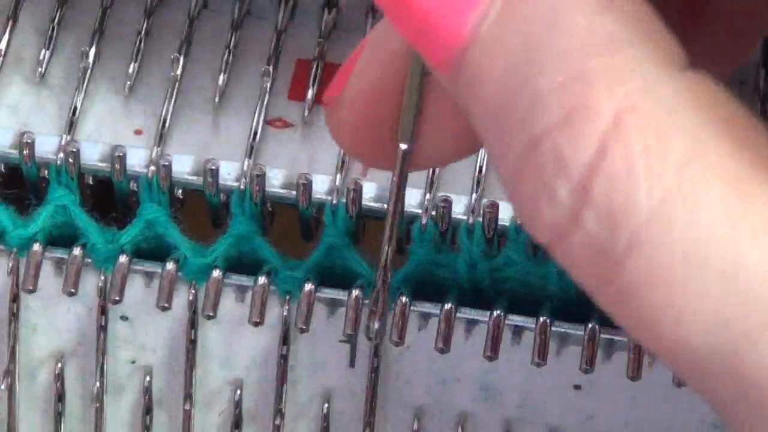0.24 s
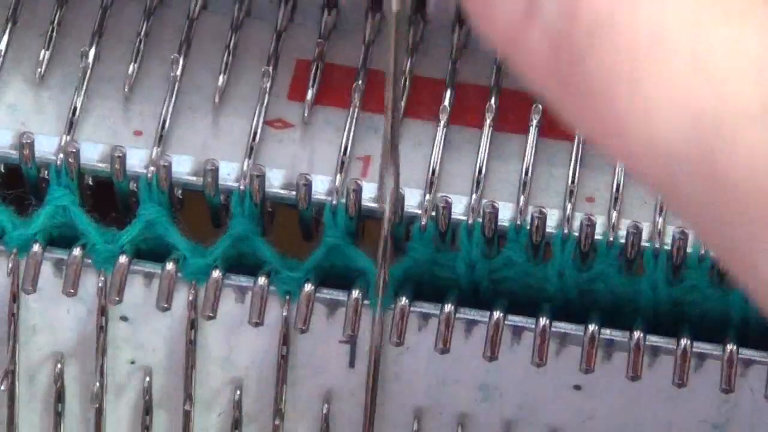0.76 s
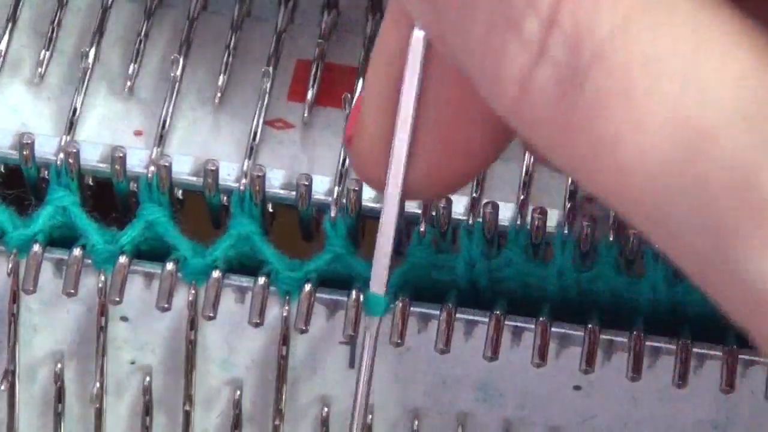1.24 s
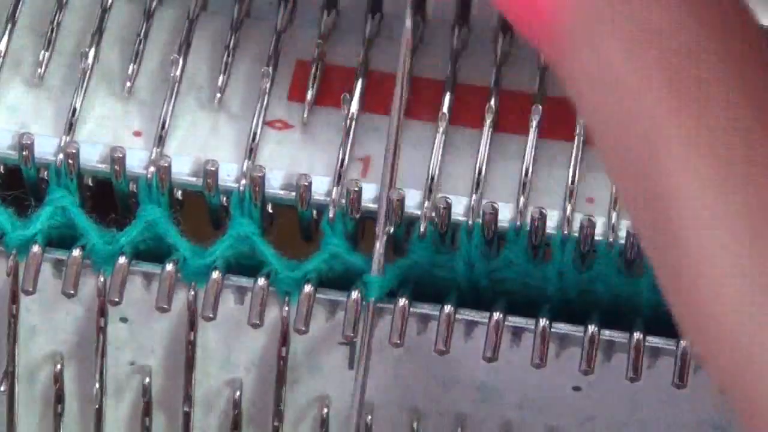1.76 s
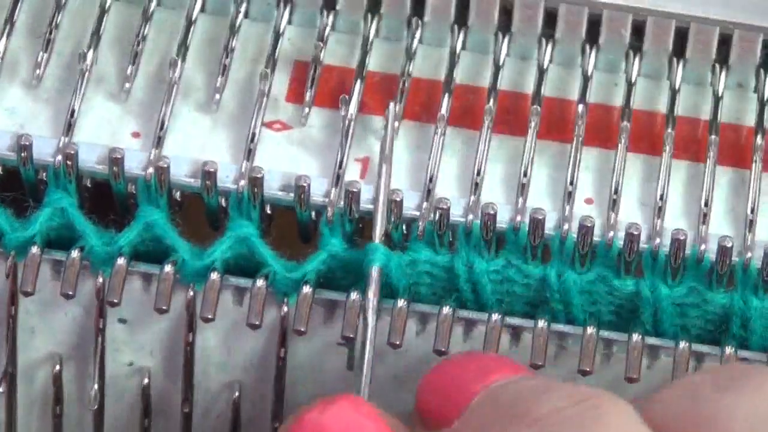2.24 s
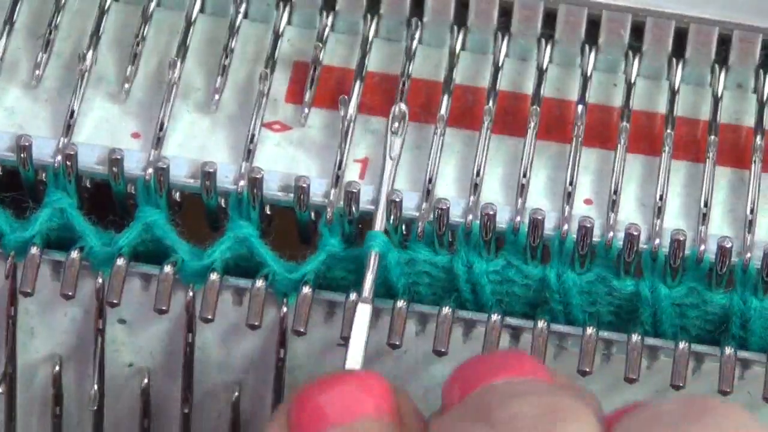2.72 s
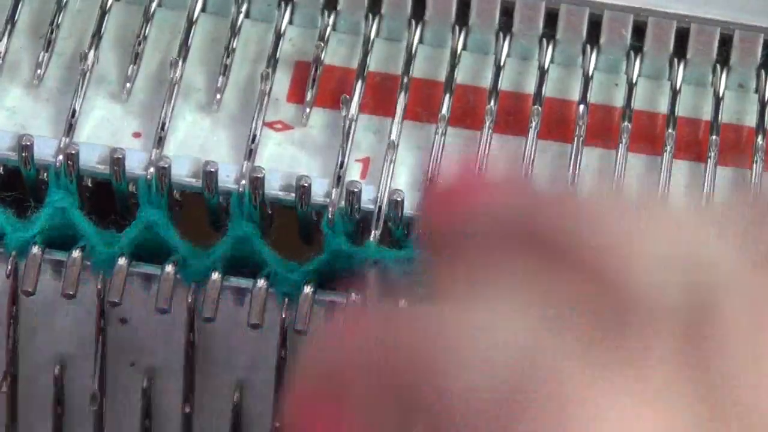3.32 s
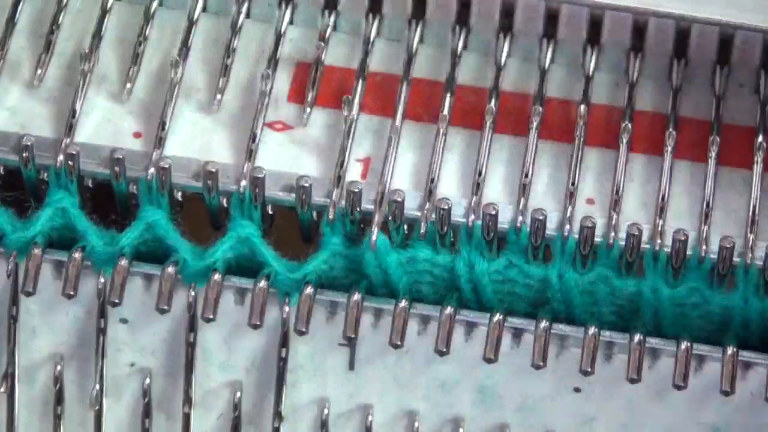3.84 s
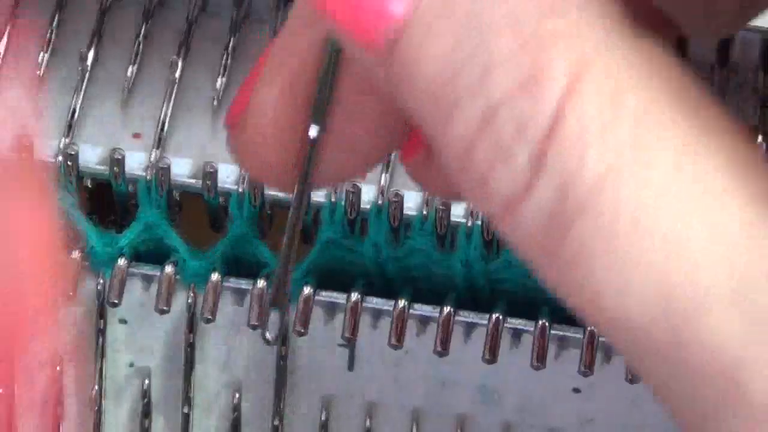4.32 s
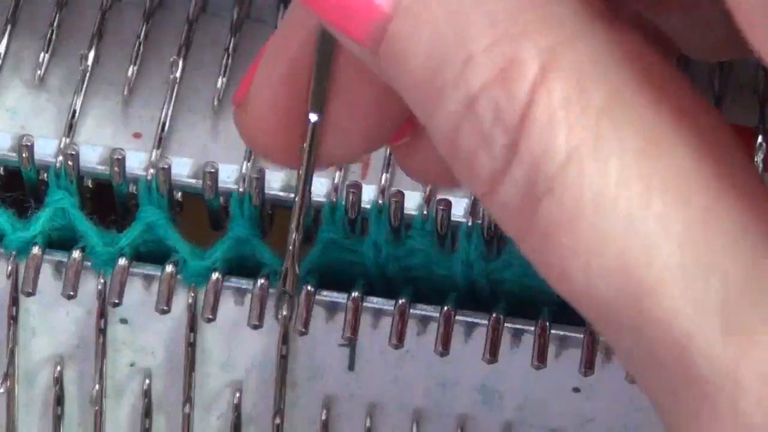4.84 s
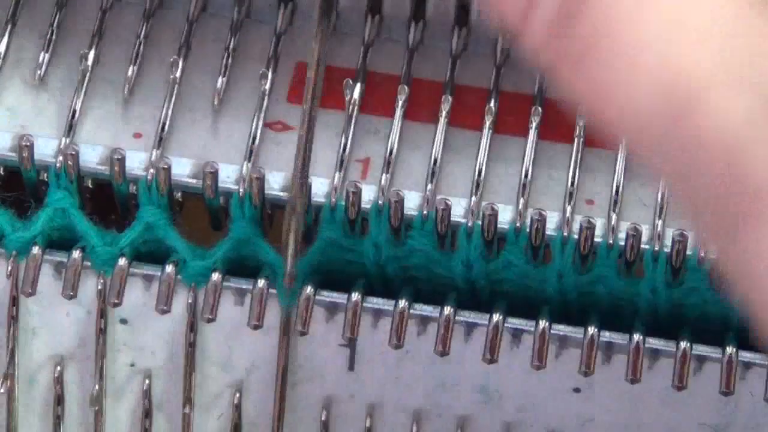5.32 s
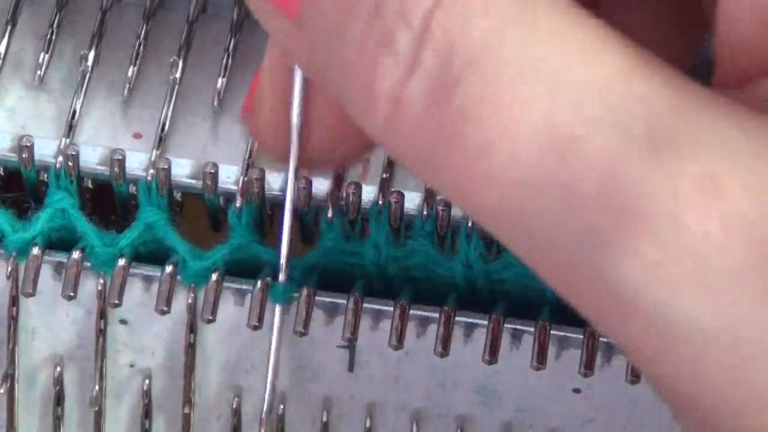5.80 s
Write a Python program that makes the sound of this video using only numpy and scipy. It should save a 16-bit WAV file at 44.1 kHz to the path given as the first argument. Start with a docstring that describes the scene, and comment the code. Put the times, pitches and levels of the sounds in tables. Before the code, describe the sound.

Close, irregular steel clicks, short scrapes and small knocks as stitches are moved by hand on a knitting machine in a quiet room.

```python
"""Light steel ticks and soft rubbing, close by, over a faint fan and low hum in a quiet room.
Stitches are moved by hand between the two steel needle beds of a knitting machine.
A slim transfer tool ticks on hooks and steel scrapes briefly; needles knock at their stops and clack
against the tool; latches snap over. Each blow rings the slim parts' bending modes and the heavy bed;
a seating needle shakes the bed's plate and thuds through frame and table."""
import sys
import numpy as np
from scipy import signal
from scipy.fft import rfft, irfft
from scipy.io import wavfile
from scipy.ndimage import uniform_filter1d

SR = 44100
rng = np.random.default_rng(int(sys.argv[2]) if len(sys.argv) > 2 else 0)


def to_wav(s):
    """Save 16-bit WAV."""
    ch = np.atleast_2d(s).T  # columns
    pcm = np.round(np.clip(ch, -1, 1) * 32767)  # PCM
    wavfile.write(sys.argv[1], SR, pcm.astype(np.int16))


N = 267246
TOP_HZ = 16100
HIT_SAMPLES = 16384
AGE_S = np.arange(HIT_SAMPLES) / SR

# Spectra of the tool's touch and of the bed. Each row: frequency in Hz, gain in dB.
TOOL_SPECTRUM = [(200, -14), (2000, -6), (4200, 0), (7000, -5), (9800, 0), (12000, -3), (14000, -10),
                 (15800, -21)]
BED_SPECTRUM = [(60, -25), (400, -11), (600, -5.5), (800, 0.5), (980, -0.5), (1150, -1), (1500, -7),
                (2200, -9.5), (5000, -25)]
# A needle's bending modes. Each row: frequency in Hz, t60 in seconds, relative level in dB.
NEEDLE_BENDING = [(1600, 0.02, -2.5), (2790, 0.029, -1), (3100, 0.084, 0.5), (3730, 0.037, -3.5),
                  (4420, .053, -6), (6030, 0.052, -7.5), (10040, 0.0069, 4.5)]


def undb(db):
    """Decibels to gain."""
    return 10 ** (np.asarray(db) / 20)


def curve(points, hz):
    """Read (Hz, dB) points on a log-frequency axis."""
    points_hz, db = np.transpose(points)
    return np.interp(np.log(hz + 1), np.log(points_hz), db)


def bins(size):
    """Spectrum frequencies in Hz for this many samples."""
    return np.fft.rfftfreq(size, 1 / SR)


def lift(hz, centre_hz, width_hz, db):
    """Resonant hump in dB."""
    return db / (1 + (2 * (hz - centre_hz) / width_hz) ** 2)


def resonance(hz, width_hz):
    """Band-pass gain over the whole scene's spectrum."""
    f = bins(N) + 1
    return 1 / np.sqrt(1 + ((f * f - hz * hz) / (f * width_hz)) ** 2)


def burst(x, db):
    """Scale a short sound to the energy of 10 ms at this level."""
    energy = np.mean(np.sum(np.atleast_2d(x) ** 2, axis=-1))
    return x * undb(db) * np.sqrt(SR / 100 / energy)


def rise(tau_s):
    """Exponential rise to 1."""
    return 1 - np.exp(-AGE_S / tau_s)


def fade(t60_s):
    """Exponential decay from 1."""
    return np.exp(-np.log(1000) * AGE_S / t60_s)


def colour(x, db):
    """Minimum-phase filter with this gain per bin."""
    cepstrum = irfft(np.log(undb(db)))
    cepstrum[1:HIT_SAMPLES // 2] *= 2
    cepstrum[HIT_SAMPLES // 2 + 1:] = 0
    return irfft(rfft(x) * np.exp(rfft(cepstrum)))


def diffuse(side_db, size=HIT_SAMPLES):
    """Stereo noise, widest in the bass; side_db shifts the width."""
    # Each row: frequency in Hz, side re mid in dB.
    stereo_width = [(30, -2), (60, -3), (125, -2), (250, -9), (500, -8.5), (1000, -12), (2400, -15),
                    (4400, -28), (8100, -4), (15000, -50)]
    mid, side = rfft(rng.standard_normal((2, size)))
    side_gain = undb(side_db + curve(stereo_width, bins(size)))
    return irfft(mid + side_gain * side * np.array([[1], [-1]]), size)


def steady(gain):
    """Stereo noise of this spectrum, rms 1."""
    noise = irfft(gain * rfft(diffuse(side_db=-0.5, size=N)), N)
    return noise / np.sqrt(np.mean(noise ** 2))


def even(x, width_hz):
    """Flatten a burst's broad spectral humps, keep its fine structure."""
    spectrum = rfft(x)
    power = np.mean(np.abs(np.atleast_2d(spectrum)) ** 2, axis=0)
    smooth_power = uniform_filter1d(power, int(width_hz * HIT_SAMPLES / SR))
    return irfft(spectrum / np.sqrt(smooth_power + 1e-12))


def mode(hz, t60_s, split, twin_db=-6):
    """A ringing mode beating against a weaker neighbour on each side."""
    twins_hz = hz * (1 + split * rng.uniform(0.25, 1.73, (2, 1)) * np.array([[1], [-1]]))
    twins = np.sin(2 * np.pi * (twins_hz * AGE_S + rng.random((2, 1)))).sum(axis=0)
    return fade(t60_s) * rise(1 / hz) * (np.sin(2 * np.pi * hz * AGE_S) + undb(twin_db) * twins)


def rings(modes, focus_hz, fall_db_oct, split, twin_db, spread_db=3.5):
    """A part's modes after a blow; each spot struck weights them anew and favours focus_hz."""
    chance_db = spread_db * rng.standard_normal(len(modes))
    return sum(burst(mode(hz, t60_s, split, twin_db),
                     db + luck_db - fall_db_oct * abs(np.log2(hz / focus_hz)))
               for (hz, t60_s, db), luck_db in zip(modes, chance_db))


def add(out, start_s, sound):
    """Mix a hit in, easing its last 100 ms to silence."""
    start = int(start_s * SR)
    ease = np.minimum(AGE_S[::-1] / .1, 1) ** 2
    out[:, start:start + HIT_SAMPLES] += (sound * ease)[..., :N - start]


def contacts(hits, spectrum, modes, ring_db, ring_t60_s, tail_db, tail_t60_s,
             ping_db, ping_t60_s, tip_db, bed_gain_db):
    """Steel on steel: hard tip, brief chatter, bending modes, dense needle ring, the bed beneath.
    Each row of hits: start in seconds, level in dB, tilt in dB per octave, contact time in seconds,
    bed level in dB before bed_gain_db, modes in dB re level, ping frequency in Hz."""
    # Resonances of all steel parts. Each row: centre in Hz, width in Hz, lift in dB.
    steel_resonances = [(3100, 1100, 4), (4460, 3000, 3.5), (5850, 1100, 5), (9460, 680, 3.5),
                        (12000, 1600, 0.5), (14600, 1400, 6)]
    out, hz = np.zeros((2, N)), bins(HIT_SAMPLES)
    steel_db = curve(spectrum, hz) + sum(lift(hz, *row) for row in steel_resonances)
    for start_s, db, tilt_db_oct, contact_s, bed_db, modes_db, ping_hz in hits:
        chatter = burst(diffuse(side_db=1.5) * np.exp(-AGE_S / (1.95 * contact_s)), 0)
        tip = burst(signal.unit_impulse(HIT_SAMPLES, int(.3 * contact_s * SR)), tip_db)
        crack = burst(even(chatter + tip, width_hz=5500), 0)
        # the ring spreads along the needle row and dies into the room
        spread = rise(0.00057) * (fade(ring_t60_s) + undb(tail_db) * fade(tail_t60_s))
        ring = burst(even(diffuse(side_db=1.5) * spread, width_hz=850), ring_db)
        shape_db = steel_db + tilt_db_oct * np.log2(np.clip(hz, 1500, 14000) / 5500)
        shape_db -= 10 * np.log10(np.mean(undb(shape_db[hz < TOP_HZ]) ** 2))  # unit mean power
        ping = burst(mode(ping_hz, ping_t60_s, split=0.062), ping_db)
        bending = burst(rings(modes, ping_hz, fall_db_oct=7.5, split=0.0235, twin_db=-3.5), modes_db)
        add(out, start_s, undb(db) * (colour(crack + ring, shape_db) + ping + bending))
        # the heavy bed answers more slowly
        swell = rise(0.0011) * (fade(0.21) + undb(-36) * fade(0.48))
        bed = colour(even(diffuse(side_db=-6.5) * swell, width_hz=360), curve(BED_SPECTRUM, hz))
        add(out, start_s, burst(bed, bed_db + bed_gain_db))
    return out


def room(air_db=-55, fan_db=-54, hum_db=-71, fan_pan_db=3, hum_pan_db=-13):
    """Air noise, a fan whirring in its housing, a wavering low hum mostly on the right."""
    # Each row: frequency in Hz, relative density in dB.
    air_spectrum = [(20, -37), (45, -30), (75, -1), (150, -1), (300, -0.5), (450, -3.5), (750, 0.5),
                    (1100, 4), (1700, -2), (2600, -6), (5500, -8.5), (8000, -12.5), (11000, -13),
                    (15800, -15.5)]
    # Each row: centre in Hz, width in Hz, relative level in dB.
    housing_resonances = [(680, 61, -5.5), (895.6, 97, 3.5), (1123, 92, 1.5), (1238.6, 45, 5),
                          (1457, 83, -6.5), (2078, 31, -7.5), (2540, 48, -15), (2845, 91, -14),
                          (5250, 85, -13)]
    sides = np.array([[.5], [-.5]])
    air = undb(air_db) * steady(undb(curve(air_spectrum, bins(N))))
    fan_power = sum((undb(db) * resonance(hz, width_hz) ** 2) ** 2
                    for hz, width_hz, db in housing_resonances)
    fan = undb(fan_db + fan_pan_db * sides) * steady(np.sqrt(fan_power))
    hum = undb(hum_db + hum_pan_db * sides) * steady(resonance(hz=48.7, width_hz=4.5) ** 2)
    return air + fan + hum


def handling(hiss_db=-16):
    """Fingers brush at a low, drifting pitch; a faint hiss near 3.6 kHz swells with the rubbing."""
    # Each row: time in seconds, level in dB, brush centre in Hz.
    rubbing = [(0, -71, 220), (.18, -63, 220.3), (.8, -76, 240), (1.3, -78, 299.7), (1.68, -62.5, 298.5),
               (2.5, -82, 220.5), (3.3, -83, 300.2), (3.72, -61, 321), (4.1, -75.5, 270.6),
               (4.429, -60, 345.2), (4.7, -82, 330.2), (5.3, -68, 320), (5.65, -59, 317.8),
               (6.05, -70.5, 398)]
    t = np.arange(N) / SR
    times_s, db, hz = np.transpose(rubbing)
    hiss = undb(hiss_db) * steady(resonance(hz=3600, width_hz=700) ** 2)
    brush = signal.hilbert(steady(resonance(hz.mean(), width_hz=130) ** 2))
    drift = np.exp(2j * np.pi * np.cumsum(np.interp(t, times_s, hz) - hz.mean()) / SR)
    return undb(np.interp(t, times_s, db)) * ((brush * drift).real + hiss)


def tool_ticks(grazes_per_s=2, graze_db=-61, graze_spread_db=5, ping_hz=10600):
    """The tool's tip touches hooks and pegs; the brighter the touch, the less it moves the bed."""
    # Each row: start in seconds, level in dB, tilt in dB per octave, contact time in seconds,
    # modes in dB re level.
    touches = [(0.1176, -54, 10, .0013, -15), (0.2256, -50.5, 1, 0.00079, -18),
               (0.2975, -49, 3, 0.0017, -17), (0.4133, -55, 2, 0.0035, 0), (0.5084, -51, 0, 0.0015, -12),
               (0.6442, -47, 1, 0.0023, -15), (0.799, -46.5, 4, 0.0017, -14),
               (0.9635, -49.5, -5, .0023, -12), (0.976, -52, 2, .0022, -10),
               (1.0456, -49.5, -2, .0028, -19), (1.7405, -52.5, 11, 0.0013, -12),
               (2.052, -54, 9, .0013, -15), (2.419, -49.5, 5, 0.003, -19), (2.4948, -45.5, 2, 0.0033, 1.5),
               (3.135, -49.5, 4, 0.0017, -15), (3.189, -54, 2, .004, 2), (3.2161, -43.5, 8, .0018, -4.5),
               (3.9098, -52, 5, .0038, -15), (4.0146, -54, 5, .003, -15), (4.48, -50.5, 5.5, .0008, -8),
               (4.6588, -44, 1, 0.0032, -15), (4.729, -43.5, 0.5, 0.0023, -19),
               (5.323, -49, 2.5, .0009, -8), (5.4361, -42.5, 0, .004, 0), (5.4915, -54, 2, 0.0032, -1),
               (5.5016, -50.5, 2, .0028, -3), (5.718, -41.5, 0, 0.005, -19)]
    # Each row: frequency in Hz, t60 in seconds, relative level in dB.
    tool_bending = [(4260, .2, 3), (11640, 0.063, 0.5), (12200, .07, -8)]
    grazes = [(when * N / SR, graze_db + graze_spread_db * (1 - 2 * softness), 3, .002, -12)
              for when, softness in rng.random((int(grazes_per_s * N / SR), 2))]
    hits = []
    for start_s, db, tilt_db_oct, contact_s, modes_db in touches + grazes:
        bed_db = db - 6 - .9 * tilt_db_oct
        hz = ping_hz * rng.uniform(0.91, 1.04)
        hits.append((start_s, db, tilt_db_oct, contact_s, bed_db, modes_db, hz))
    return contacts(hits, TOOL_SPECTRUM, tool_bending, ring_db=-4.5, ring_t60_s=0.044, tail_db=-7,
                    tail_t60_s=0.28, ping_db=-4, ping_t60_s=0.008, tip_db=-25, bed_gain_db=1)


def steel_grit(grains_per_s=1200, grain_spread_db=5, bed_gain_db=-8):
    """Short scrapes and a few tiny gritty ticks of steel, made of dense uneven grains."""
    # Each row: start in seconds, length in seconds, level in dB.
    scrapes_and_ticks = [(0.458, 0.02, -37), (0.777, 0.06, -45), (0.944, .03, -46), (3.462, 0.0032, -48),
                         (3.491, 0.0083, -51), (3.521, 0.011, -50), (5.145, .016, -47), (5.443, 0.027, -48)]
    out, hz = np.zeros((2, N)), bins(HIT_SAMPLES)
    for start_s, length_s, db in scrapes_and_ticks:
        onsets = rng.random(HIT_SAMPLES) < grains_per_s / SR
        grains = onsets * undb(grain_spread_db * rng.standard_normal(HIT_SAMPLES))
        envelope = np.sqrt(np.abs(np.sin(np.pi * np.minimum(AGE_S / length_s, 1))))
        grain_response = diffuse(side_db=-7) * (fade(0.0042) + undb(-30.5) * fade(0.66))
        grit = irfft(rfft(grains * envelope) * rfft(even(grain_response, width_hz=2400)))
        steel = colour(grit, curve(TOOL_SPECTRUM, hz))
        bed = colour(grit, curve(BED_SPECTRUM, hz))
        add(out, start_s, burst(steel, db) + burst(bed, db + bed_gain_db))
    return out


def needle_knocks():
    """A needle is pushed along its slot to the stop."""
    hits = [(0.6014, -36, -5.5, 0.0029, -34.5, -0.5, 1670), (0.9241, -36, 0.5, 0.004, -37.5, -2, 3100),
            (2.9916, -51.5, -3.3, 0.0032, -70, -2, 3470), (3.0425, -46, -1.5, 0.0036, -67, 4.5, 2710),
            (5.0155, -40.5, 0, 0.00245, -39, -22, 3810), (5.1261, -31, -5, 0.0013, -35, -5.5, 1640),
            (5.4515, -37, 1.5, 0.0031, -33, -1, 1680)]  # Rows as in contacts().
    spectrum = [(100, -27.5), (900, 0.5), (1700, -0.5), (3000, -5.5), (4000, -8.5), (7000, -10),
                (10000, -4), (15800, -22)]  # Each row: frequency in Hz, gain in dB.
    return contacts(hits, spectrum, NEEDLE_BENDING, ring_db=-6.5, ring_t60_s=0.039, tail_db=2,
                    tail_t60_s=0.33, ping_db=-8.5, ping_t60_s=0.047, tip_db=-10.5, bed_gain_db=-2.5)


def needle_clacks():
    """Tool and needle hit each other; the needle rings."""
    hits = [(0.6622, -29, 1, 0.00027, -34, -14, 2790), (2.1127, -44, 3, 0.0037, -65, -2.5, 2920),
            (2.129, -37, 3.5, 0.0018, -45, -9.5, 3100), (3.1358, -54, 9, 0.0014, -54, 5, 3100),
            (3.4686, -38, -0.5, 0.0012, -36, -1, 4240), (3.5269, -39, 2.2, 0.00327, -41, -14, 4010),
            (5.167, -25.5, 0.4, 0.00051, -29.5, -11.5, 3080)]  # Rows as in contacts().
    spectrum = [(100, -12), (1200, -9.5), (2800, -0.5), (4500, -5), (7000, -6), (9600, -1), (12000, -8),
                (15800, -29)]  # Each row: frequency in Hz, gain in dB.
    return contacts(hits, spectrum, NEEDLE_BENDING, ring_db=-5, ring_t60_s=0.059, tail_db=-9,
                    tail_t60_s=0.2, ping_db=-11.5, ping_t60_s=0.057, tip_db=-5.5, bed_gain_db=-4.5)


def bed_thumps(thud_t60_s=0.47):
    """A needle seats: the bed's steel plate rings, frame and table thud."""
    # Each row: start in seconds, plate level in dB, plate focus in Hz, thud level in dB, thud in Hz.
    seatings = [(.664, -55, 755, -49.5, 269), (.932, -35.5, 680, -41.5, 110),
                (1.409, -30.5, 803, -39.5, 407), (2.132, -51, 733, -57, 222), (3.06, -48.5, 680, -59, 300),
                (3.53, -49.5, 680, -49.5, 121), (5.131, -36.5, 760, -47.5, 273),
                (5.169, -59, 704, -46, 161), (5.459, -35.5, 680, -44, 106)]
    # Each row: frequency in Hz, t60 in seconds, relative level in dB.
    plate_modes = [(680, 0.14, -3.5), (782, 0.15, -2), (1180, 0.076, 12.5)]
    thud_spectrum = [(40, -28), (100, -1.5), (170, -0.5), (260, 3), (420, -2.5), (600, 6.5), (1500, -66)]  # Each row: frequency in Hz, gain in dB.
    out, hz = np.zeros((2, N)), bins(HIT_SAMPLES)
    for start_s, plate_db, plate_hz, thud_db, thud_hz in seatings:
        plate = rings(plate_modes, plate_hz, fall_db_oct=35, split=0.1005, twin_db=-13.5) * rise(0.0023)
        frame = even(diffuse(side_db=-6) * fade(thud_t60_s) * rise(0.003), width_hz=57)
        thud = colour(frame, curve(thud_spectrum, hz) + lift(hz, thud_hz, 0.38 * thud_hz, db=11))
        add(out, start_s, burst(plate, plate_db) + burst(thud, thud_db))
    return out


def latch_snaps():
    """A slim latch flicks over and rings high."""
    hits = [(0.8715, -28.5, 0.5, 0.00075, -47, -13, 10000), (1.4059, -24.5, -2.5, 0.00041, -35.5, -6, 4530),
            (5.4051, -27, -0.5, 0.0008, -48, -14.5, 5200)]  # Rows as in contacts().
    spectrum = [(100, -25), (800, -35), (2500, -10.5), (3400, -20), (4300, 1), (6300, -3), (7800, 6.5),
                (9800, 4), (11500, 1.5), (13500, 1), (15800, -16)]  # Each row: frequency in Hz, gain in dB.
    # Each row: frequency in Hz, t60 in seconds, relative level in dB.
    latch_bending = [(4264, .12, 2), (4560, 0.11, -8), (4820, 0.086, 4.5), (5400, 0.088, -2),
                     (9900, 0.018, 0), (15300, .011, 7)]
    return contacts(hits, spectrum, latch_bending, ring_db=-4.5, ring_t60_s=0.014, tail_db=-18.5,
                    tail_t60_s=0.23, ping_db=-13.5, ping_t60_s=0.035, tip_db=-1, bed_gain_db=3)


def scene():
    """Handwork on the machine over the quiet room."""
    steel = latch_snaps() + needle_clacks() + needle_knocks() + tool_ticks() + steel_grit()
    return steel + bed_thumps() + handling() + room()


def record(dry):
    """Steep low-pass at TOP_HZ."""
    return signal.sosfilt(signal.ellip(8, .2, 70, TOP_HZ, fs=SR, output="sos"), dry)


dry = scene()
out = record(dry)
to_wav(out)
```